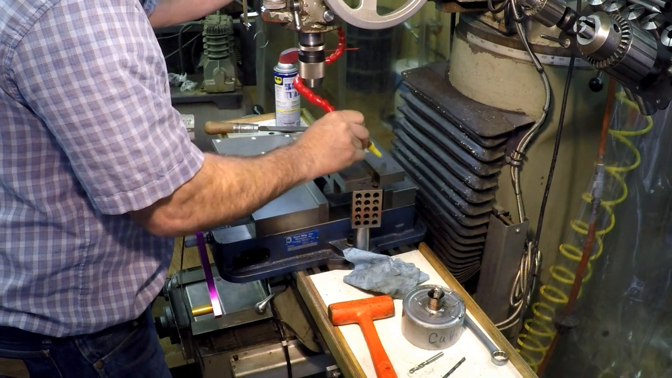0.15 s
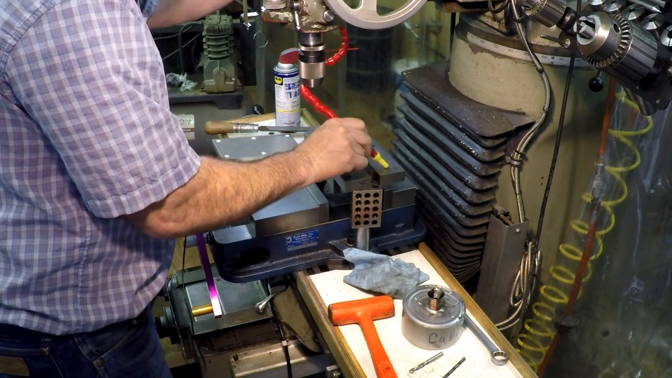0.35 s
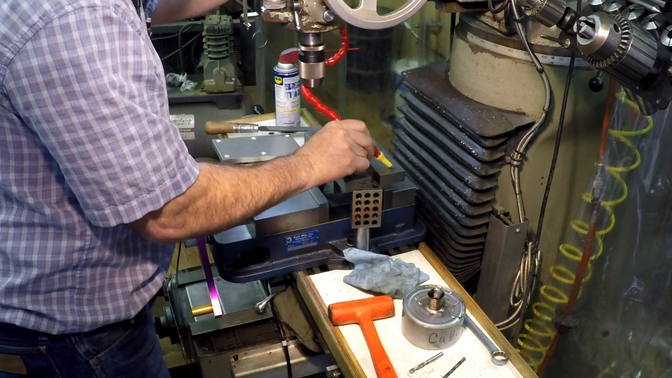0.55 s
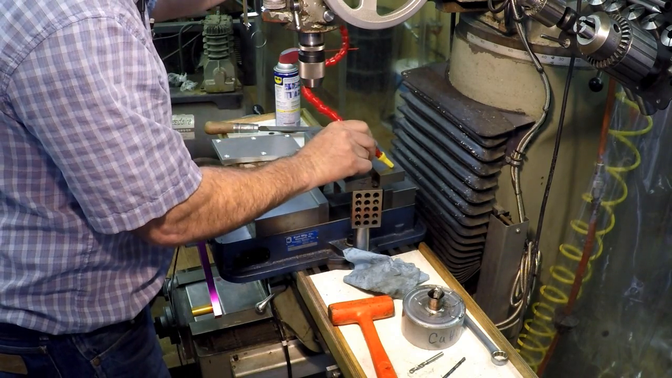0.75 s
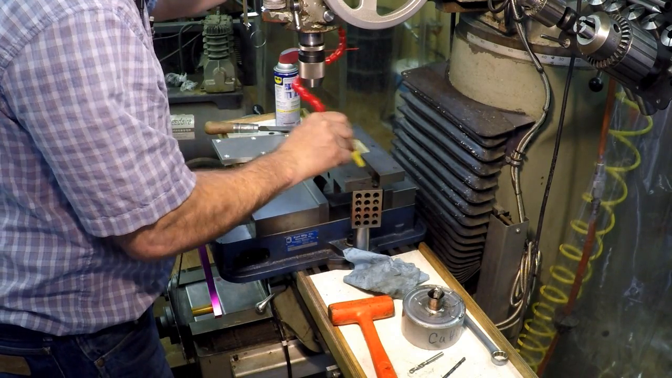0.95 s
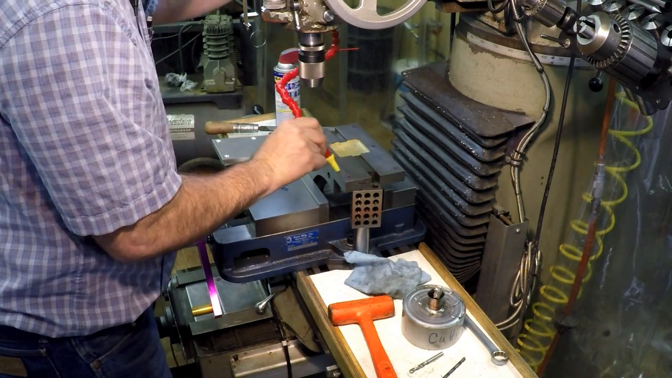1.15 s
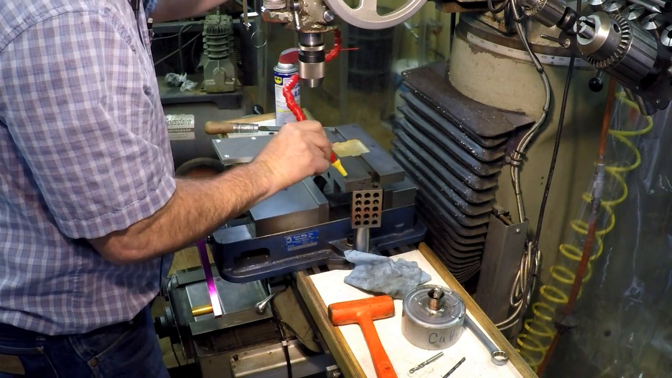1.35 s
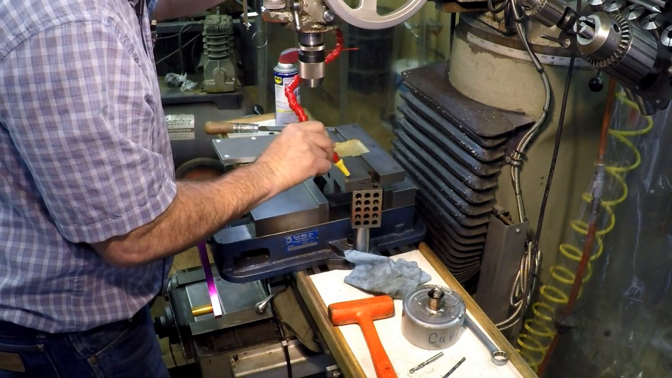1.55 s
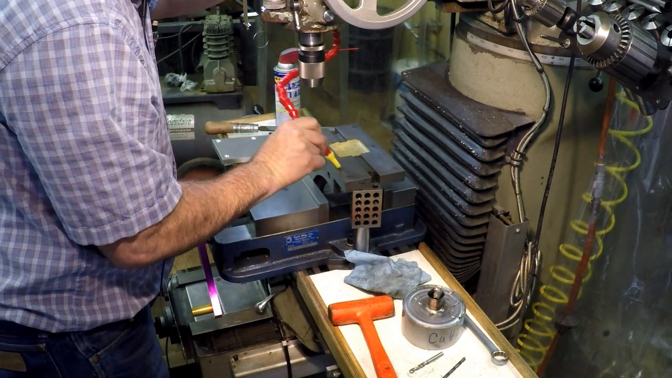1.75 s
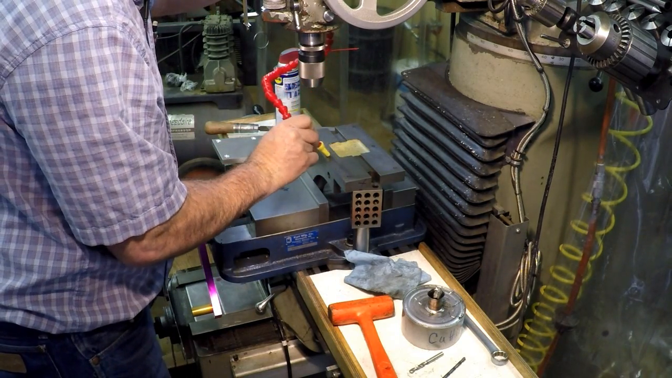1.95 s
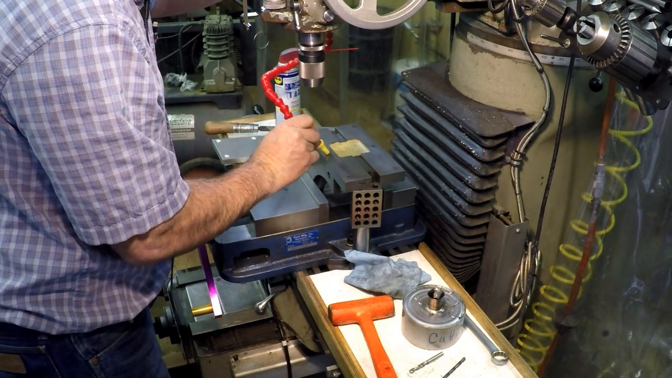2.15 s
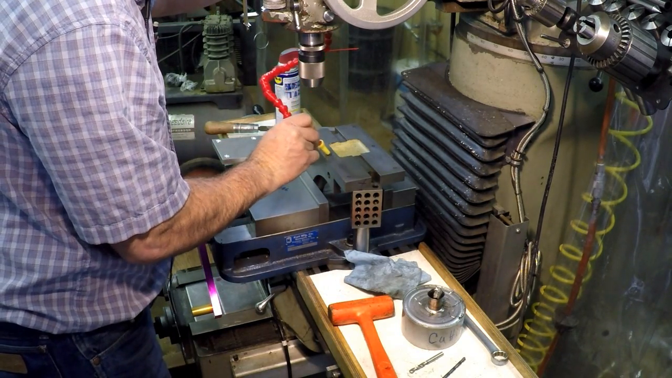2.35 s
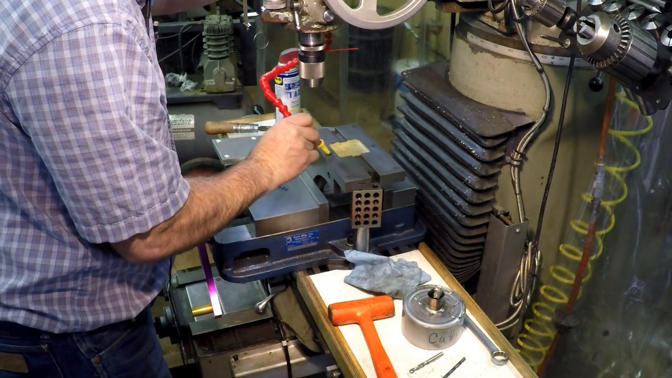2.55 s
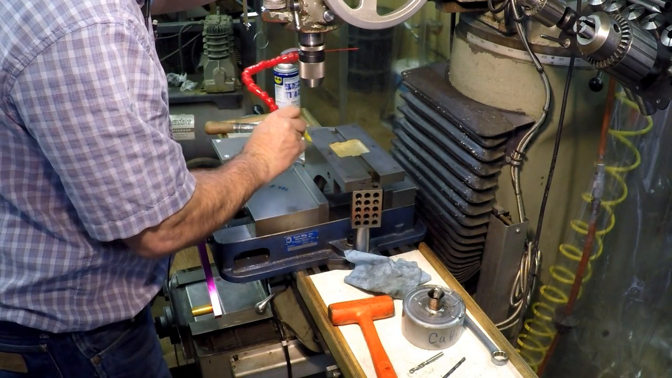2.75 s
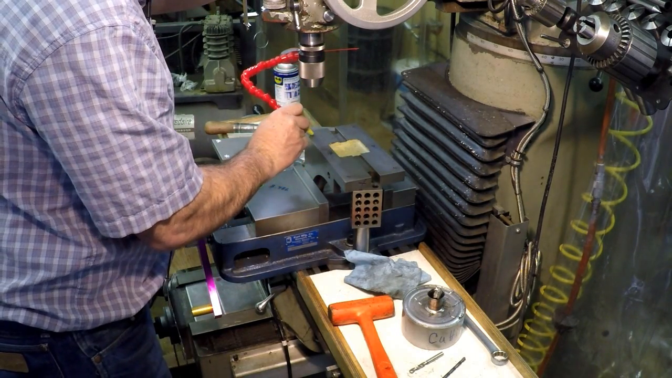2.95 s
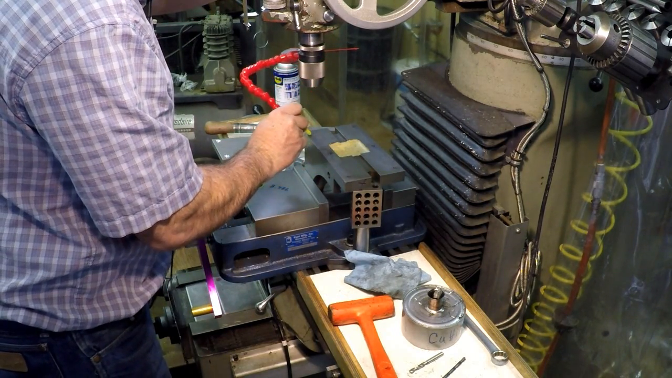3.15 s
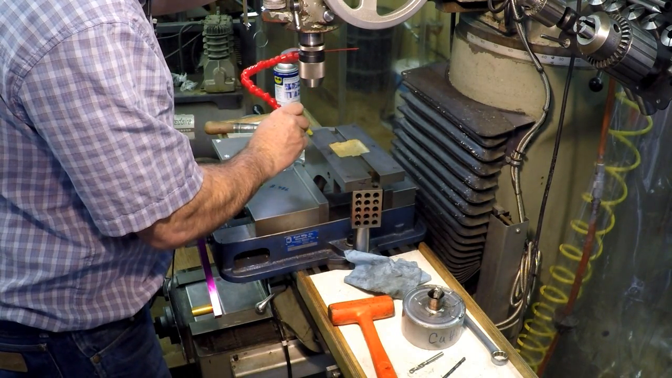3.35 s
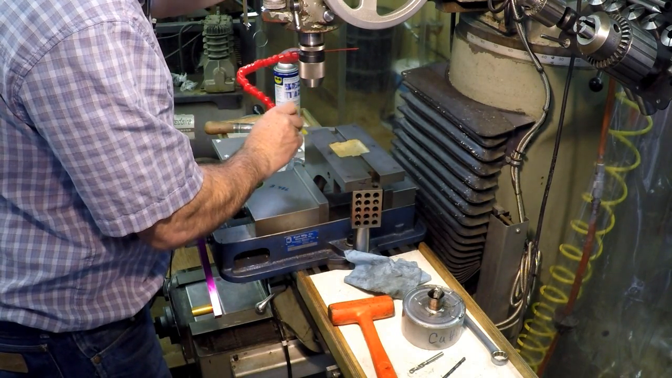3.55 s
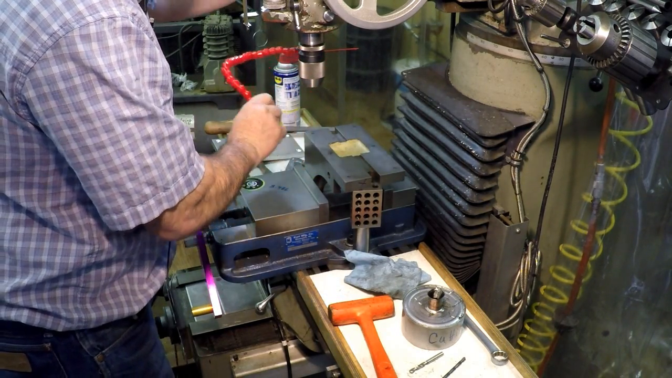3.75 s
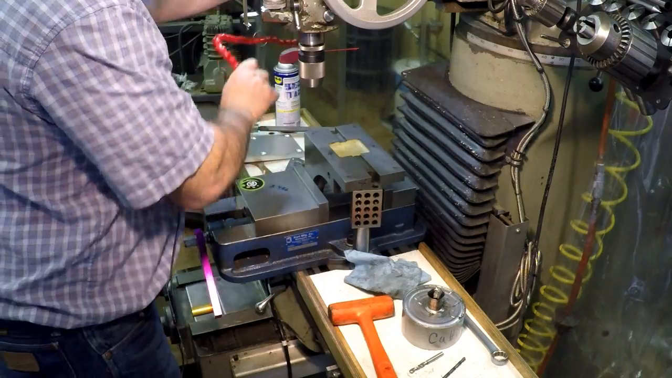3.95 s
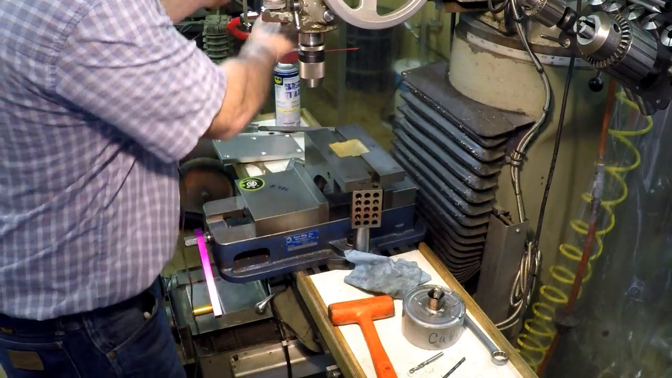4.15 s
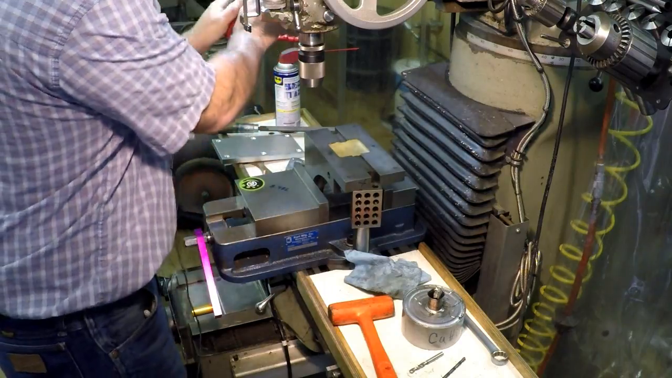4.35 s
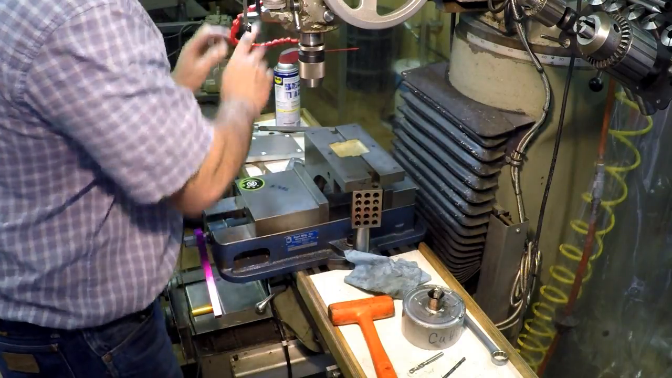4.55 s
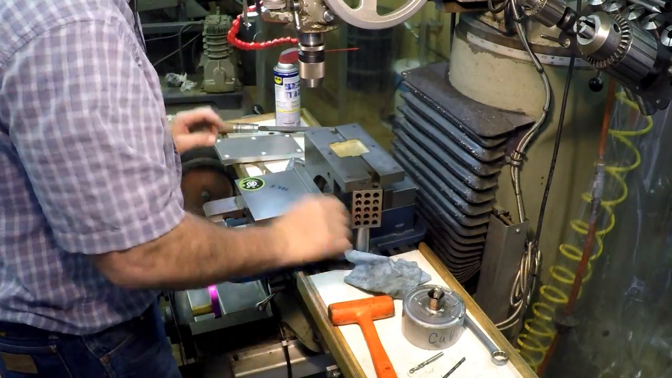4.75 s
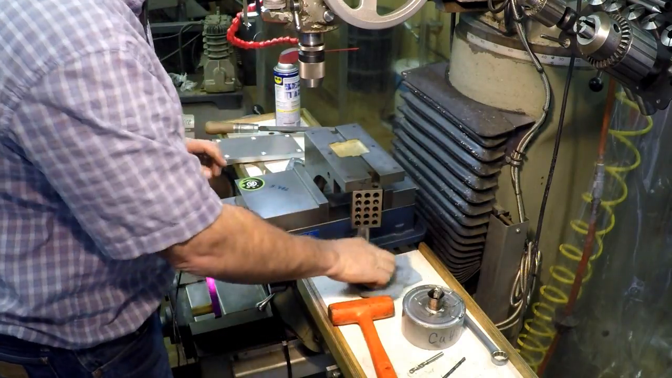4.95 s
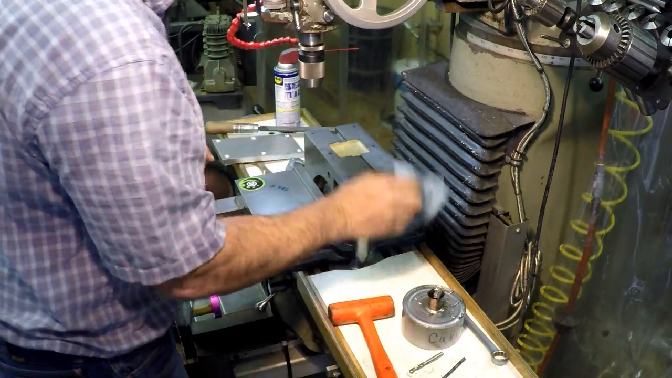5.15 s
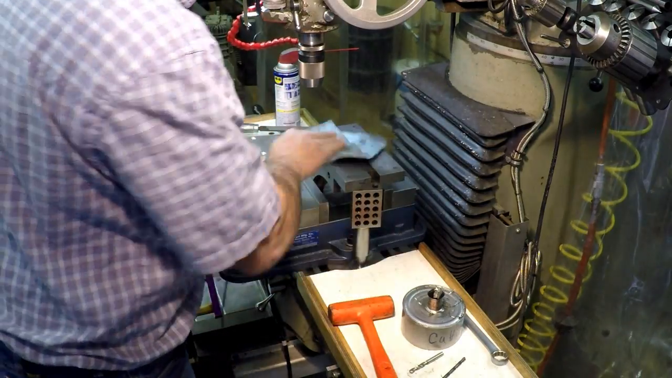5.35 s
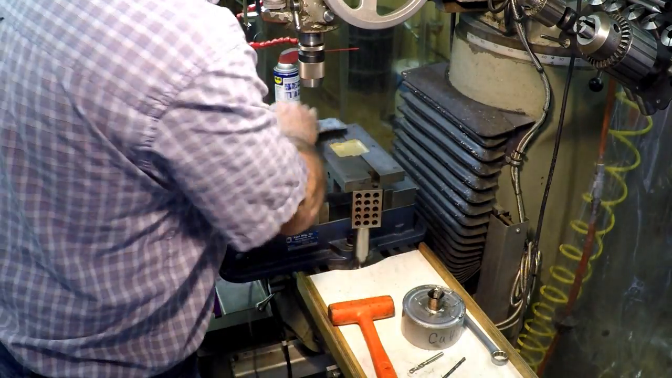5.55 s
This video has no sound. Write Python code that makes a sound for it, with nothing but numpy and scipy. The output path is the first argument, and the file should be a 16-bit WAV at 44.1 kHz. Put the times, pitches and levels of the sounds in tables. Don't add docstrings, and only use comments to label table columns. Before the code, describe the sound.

In a machine shop, an air blow gun sweeps across a metal vise, its bright hiss surging and dipping while shrill whistles slide, flutter and lock on small holes. After almost four seconds the valve shuts. A jointed plastic hose snaps and creaks, then a rag is picked up among lightly chirping tools with one low knock. A small camera microphone at arm's length catches gusts, distant hum and slight room reflections.

```python
import sys
import numpy as np
from scipy import signal
from scipy.fft import rfft, irfft, next_fast_len
from scipy.io import wavfile
from scipy.ndimage import uniform_filter1d

SR = 44100
rng = np.random.default_rng(int(sys.argv[2]) if len(sys.argv) > 2 else 0)


def gain_from_db(level_db):
    decades = np.asarray(level_db, float) / 20
    return 10 ** decades


def pcm_store(signal):
    levels = np.round(np.clip(np.atleast_2d(signal), -1, 1) * 32767)
    wavfile.write(sys.argv[1], SR, levels.astype(np.int16).T)


N = 247396

# [low f/Hz, high f/Hz]
JET_LAYERS = [(7000, 10500), (900, 2000), (2200, 4400), (13000, 15300), (300, 800)]
# [f/Hz, density/dB per Hz]
JET_COLOUR = [(88, -63), (150, -31), (500, -30.5), (862, -22.5), (932, -24.5), (1030, -23.5), (1570, -17.5),
              (2420, -18.5), (2660, -12.5), (4330, -8), (5680, -3.5), (8540, -6), (10600, -19.5),
              (14700, -19), (15600, -19)]
# [t/s, hiss level/dB, depth/dB: near 0 down in a slot, low on a flat face]
NOZZLE_PATH = [(0, -26.5, -17), (.25, -27, -12), (.41, -27.5, -10.5), (.6, -24, -17.5), (.75, -38, -17),
               (.88, -47, -15.5), (1.03, -44, -18.5), (1.045, -48, -8.5), (1.24, -41, -10.5),
               (1.46, -31.5, -12.5), (1.66, -35, -14.5), (1.97, -47.5, -11.5), (2.17, -31.5, -18),
               (2.4, -36, -13.5), (2.64, -37.5, -18), (2.93, -44, -6), (3.22, -32.5, -8.5),
               (3.4, -41, -13.5)]
# [start t/s, length/s, extra hiss level/dB, share reaching the roar/0-1]
SHARP_EDGES = [
    (0, 0.12, 3.5, 0.4),
    (0.416, 0.036, 4, .1),
    (0.982, 0.033, 11, 0.3),
    (1.115, 0.043, 5.5, 0.9),
    (1.27, 0.038, 6, 0.1),
    (1.723, .11, 13.5, 0),
    (2.33, 0.13, 5, 0.8),
    (2.717, 0.067, 18, 0.48),
    (3.16, 0.21, 1, .1),
]
# [f/Hz, width/Hz, level/dB]
VISE_GAPS = [(1290, 100, -2), (1610, 73, 1), (2630, 72, 3), (2959, 63, 7), (2976, 70, -8.5), (3390, 110, 4),
             (5040, 150, 3), (6650, 100, -2), (7450, 150, 4.5), (8530, 123.63, 0.5), (9340, 90, 0),
             (11700, 170, 2.5)]
# [start t/s, length/s, f/Hz, width/Hz, level/dB]
RASPS = [(0, 0.08, 5840, 930, -19.5), (0, 0.11, 7100, 500, -27), (0.16, 0.06, 5480, 250, -32),
         (0.414, 0.33, 6300, 300, -28), (1.362, .05, 5250, 300, -41), (1.576, 0.045, 4820, 200, -30.5),
         (1.735, 0.085, 4850, 400, -32), (1.755, 0.07, 5590, 500, -27), (2.382, 0.08, 5400, 1500, -29.5),
         (2.725, 0.065, 6020, 300, -26.5), (3.158, 0.6, 6780, 500, -41.5), (2.891, 0.08, 680, 520, -53),
         (5.515, 0.16, 5500, 4000, -59), (3.197, 0.17, 5270, 300, -41.5), (3.0, .74, 9000, 1500, -50),
         (3.14, .13, 14400, 900, -50), (.23, .48, 3000, 1500, -46), (2.375, .025, 5550, 300, -24),
         (.993, .02, 5600, 2200, -39), (1.128, .022, 4200, 2500, -44), (1.722, .04, 220, 160, -58),
         (3.715, .025, 5450, 400, -33), (3.69, .05, 5900, 500, -27), (.55, .17, 1900, 900, -52),
         (.47, .2, 5600, 500, -28), (0, .1, 6500, 250, -28)]
# [start t/s, length/s, f/Hz, width/Hz, level/dB]
SPLASHES = [(2.39, 0.081, 4500, 1600, -40.5), (2.72, 0.067, 2700, 1800, -54),
            (2.893, 0.052, 700, 280, -49.5), (2.98, .06, 1230, 500, -56), (1.726, .035, 8200, 2200, -34),
            (1.727, .035, 11700, 500, -33), (1.35, .06, 4670, 530, -36.5), (1.4, 0.098, 5400, 920, -32),
            (.22, 0.114, 3040, 1300, -39.5), (3.3, 0.46, 230, 120, -64), (4.225, 0.123, 1050, 500, -55.5),
            (4.39, 0.069, 1160, 600, -59), (4.5, 0.05, 1120, 600, -56.5), (1.04, 0.4, 2140, 500, -60),
            (.07, .052, 6300, 2500, -29), (2.45, .13, 7700, 1300, -40), (4.417, .012, 3900, 1500, -60),
            (4.8, .012, 4200, 2500, -61)]
# [loose breathy tone level/dB, [t/s, pitch f/Hz]]
HOLE_PASSES = [ (-27, [(.44, 5317), (.52, 5320), (.57, 5620), (.62, 5620)]), (-46, [(.618, 5800),
               (.69, 5847), (.74, 6167), (.82, 6250), (.875, 6178), (.922, 6320), (1.01, 6370)]),
               (-30, [(1.41, 5200), (1.44, 5380), (1.485, 5467), (1.5, 5600), (1.525, 5730), (1.537, 5980),
               (1.546, 5900), (1.562, 6220)]), (-27, [(1.558, 5670), (1.59, 5460), (1.607, 5274),
               (1.722, 6427)]), (-27, [(1.724, 5845), (1.76, 5860), (1.835, 6350)]), (-30, [(1.835, 6090),
               (1.885, 5400), (1.905, 5050)]), (-32.5, [(2.22, 5194), (2.28, 5690), (2.335, 5700),
               (2.349, 6400), (2.355, 6300), (2.366, 5570), (2.395, 5480)]), (-28.5, [(2.45, 5117),
               (2.495, 6230), (2.55, 6490), (2.578, 6220), (2.61, 5584), (2.65, 5085), (2.702, 5990),
               (2.778, 6365), (2.825, 4860)]), (-39.5, [(3.08, 5180), (3.12, 5310)]), (-27.5, [(3.17, 5800),
               (3.214, 6027), (3.3, 5894), (3.345, 5890), (3.364, 5950)]), (-40, [(3.362, 5940),
               (3.41, 6094), (3.545, 6075), (3.65, 6024), (3.71, 5920), (3.74, 5700)])]
# [start t/s, length/s, level/dB, change until it lets go/dB]
HOLDS = [(0.552, 0.067, -20, 2), (0.629, 0.12, -12, 1.5), (0.731, 0.089, -9.5, 0.5),
         (0.817, 0.099, -11, -7.5), (0.92, 0.025, -22, 1.5), (0.944, 0.05, -20.5, -1),
         (1.427, 0.09, -26.5, 5.5), (1.562, 0.032, -10, -3), (1.611, 0.04, -20, 10.5),
         (1.651, 0.055, -11, 2.5), (1.705, 0.025, -15, -10), (1.728, 0.049, -5, -22.5),
         (1.837, 0.046, -14.5, -10), (3.242, 0.034, -9.5, -9.5), (3.298, 0.042, -5.5, -9.5),
         (3.363, 0.075, -11, 1), (3.421, .04, -6, -0.5), (3.455, .09, -8, -5.5), (3.541, 0.16, -14, 0.5),
         (3.699, 0.037, -19, 2)]
# [middle t/s, peak level/dB, half length/s]
FLICKS = [(0.518, -13.5, 0.0081), (0.579, -11, 0.0015), (.571, -14.5, .002), (.59, -16, .002),
          (0.613, -15, 0.0036), (0.626, -7.5, 0.0035), (0.537, -15.5, 0.0034), (1.501, -16, 0.0086),
          (1.537, -12.5, 0.0094), (2.256, -20.5, 0.0058), (2.279, -10.5, 0.011), (2.287, -16, 0.004),
          (2.354, -25.5, 0.0095), (2.361, -10, 0.0032), (2.367, -10, .003), (1.553, -17.5, 0.0071),
          (2.481, -6.5, 0.0176), (2.594, -8, 0.016), (2.69, -8.5, 0.014), (2.795, -9.5, 0.0098),
          (3.095, -25.5, 0.012), (3.213, -9, 0.0088), (3.284, -11.5, 0.004), (3.593, -10, 0.024),
          (3.352, -6.5, 0.0087)]
# [middle t/s, gain change/dB, half length/s]
FLICKERS = [(0.633, -8, 0.0012), (0.639, -9, 0.0021), (0.644, -5, 0.0013), (0.663, -2.5, 0.0038),
            (0.686, -10, 0.0024), (0.721, -6, 0.001), (0.728, -8.5, 0.0021), (0.7421, -4, 0.0009),
            (1.57, -8, 0.002), (1.581, -19, 0.001), (1.5854, -12, 0.00055), (1.63, -4, 0.0014),
            (1.644, -6, 0.0011), (1.655, -6.5, .0015), (1.6682, -6.5, 0.0023), (1.682, -8.5, 0.0023),
            (1.702, -3.5, 0.0019), (1.742, -12.5, 0.0007), (1.748, -8, 0.0008), (1.756, -12, 0.0014),
            (1.852, 1, 0.0009), (1.8614, 7, 0.00079), (1.868, -5, 0.00067), (1.875, -5, 0.0012),
            (2.2843, -7.5, 0.0009), (2.287, -6, .0009), (2.479, -18, 0.0009), (2.4887, -9.0, 0.00092),
            (2.493, -7, 0.0011), (2.598, -25, 0.0009), (2.604, -4, 0.0015), (2.6916, -15, 0.0009),
            (2.696, 3, 0.0006), (2.801, -10, 0.00064), (3.246, -8, .002), (3.2545, -21, 0.0009),
            (3.26, -17.0, 0.0015), (3.303, -5.5, .001), (3.307, -3.5, .001), (3.332, -7, .001),
            (3.348, -8, .001), (3.3167, -12.5, 0.001), (3.452, -12, 0.0012), (3.4673, -7, 0.0017),
            (3.545, -9.5, 0.006), (3.567, -5.5, 0.005), (3.665, -8, 0.0017), (3.712, -12, 0.0009),
            (3.721, -9, 0.0013), (3.7285, -14, 0.0012)]
# [start t/s, length/s]
HAND_STILL = [
    (.72, .22),
    (3.36, .29),
]
# [t/s, level/dB]
HOLLOW_LEVEL = [
    (2.85, -72),
    (2.95, -54),
    (3.03, -37.5),
    (3.26, -38.5),
    (3.332, -50),
    (3.722, -55.5),
    (3.75, -62),
]
# [f/Hz, width/Hz, level/dB]
HOLLOW_MODES = [(418, 38.6, -2), (668, 65, 0.5), (1300, 50, 9), (1476, 17, 3.5), (2786, 80, -18),
                (3350, 66, -3.5)]
# [middle t/s, level/dB, half length/s]
GUSTS = [(0, -55.5, 0.12), (0.3, -53.5, 0.078), (.62, -55.5, 0.061), (0.807, -44.5, 0.069),
         (1.7, -49.5, 0.017), (1.739, -45, 0.018), (2.857, -67.5, 0.57), (3.587, -60, 0.15),
         (4.221, -66, 0.063), (4.463, -62, 0.055), (4.94, -63.5, .12), (5.519, -61.5, .12)]
# [f/Hz, density/dB per Hz]
SHOP_COLOUR = [(24, -9.5), (40, -3), (120, -3), (170, -12), (510, -13.5), (1190, -17.5), (1490, -12),
               (1960, -22.5), (4300, -24), (8000, -26.5), (11000, -32.5), (14500, -30.5), (15600, -47)]
# [t/s, repetition f/Hz, pitch f/Hz, level/dB]
CAMERA_TICK = (4.6304, 59.94, 12800, -63)
# [t/s, peak level/dB, ring against it/dB, centre of ring f/Hz]
SNAPS = [(3.9582, -23, -8.5, 4170), (4.048, -30.5, -10.5, 1300), (4.1156, -32, -15, 426),
         (4.1628, -29, -13, 410), (4.1995, -29.5, 0.5, 4300), (4.2144, -49, 4.5, 427),
         (4.3899, -46.5, 1, 4400), (4.4183, -50, 4, 3760), (4.4512, -51.5, 12, 1490), (4.528, -52, 2, 1200),
         (4.242, -49, -2, 1100), (4.269, -51, 0, 1003), (4.291, -49, 1, 1160), (4.318, -60, -3, 998),
         (4.4777, -48, 10, 1482), (4.5404, -47.5, 11, 2420), (4.6235, -48, 6, 2000),
         (4.975, -53.5, 5, 3000), (4.8037, -58.5, -16, 1530), (5.0726, -54, 6, 4400),
         (5.1017, -48, -3, 1490)]
# [f/Hz, density/dB per Hz]
SNAP_COLOUR = [(290, -43), (1000, -12), (1820, -3.5), (2160, -3), (2540, -7), (3190, -0.5), (4980, -4),
               (8980, -3), (15500, -21.5)]
# [f/Hz, level/dB, t60/s]
HOSE_MODES = [(311, 5, 0.2), (419.5, 7.5, 0.3), (870, 2, 0.27), (925, -10.5, 0.26), (1120, -2.5, 0.26),
              (1300, -3, 0.085), (2117, -2, 0.078), (3760, -3, 0.056), (4400, 1.5, 0.051)]
# [t/s, peak level/dB, f/Hz, length/s]
CREAKS = [(3.968, -51, 431, 0.041), (4.12, -51, 420, 0.04), (4.165, -49.5, 420, 0.035),
          (4.22, -54, 320, 0.132), (4.236, -53, 1130, 0.075), (4.232, -53, 917, 0.13),
          (4.393, -57, 407, 0.053), (4.452, -57, 1490, 0.04), (4.47, -53.5, 324, 0.075),
          (4.5, -52.5, 850, .12), (4.627, -54, 1300, .03), (4.39, -56, 1250, .035),
          (4.335, -55, 1100, .035), (4.12, -55, 1250, .03), (4.052, -55, 1300, .04)]
# [t/s, peak level/dB, f/Hz, length/s]
CHIRPS = [(4.815, -52, 1490, .02), (4.84, -51, 1490, .045), (4.85, -59, 1640, .04), (4.89, -51, 1490, .045),
          (4.935, -55, 1490, .1), (4.945, -56, 1640, .04), (5.097, -54, 1500, .025),
          (5.355, -53, 1480, .035), (5.525, -56, 1500, .025), (5.555, -57, 1500, .05),
          (5.56, -59, 1650, .04)]
# [t/s, level/dB, f/Hz, t60/s]
THUMP = (5.103, -34, 205, .18)
# [start t/s, length/s, level/dB, brightness/dB]
RUBS = [(3.973, 0.025, -56, 8), (4.047, 0.094, -51, -10), (4.112, 0.05, -48, -6), (4.156, 0.038, -42.5, -1),
        (4.193, 0.054, -42.5, -6), (4.235, 0.16, -46.5, -12.5), (4.386, 0.075, -48.5, -15),
        (4.454, 0.1, -52, -9), (4.51, 0.042, -55, -14), (4.533, 0.086, -54.5, -5), (4.628, 0.09, -58, -23),
        (4.801, .25, -76, -8.5), (5.092, 0.2, -61, 0), (5.532, 0.53, -62, 9.5)]
# [f/Hz, density/dB per Hz]
RUSTLE_COLOUR = [(88, -44), (150, -20), (257, -8.5), (300, -0.5), (450, -9.5), (601, -14.5), (1130, -4.5),
                 (1670, -14), (2310, -14), (8100, -31), (15000, -47)]
# [f/Hz, t60/s]
ROOM_DECAY = [(300, 0.29), (2000, 0.42), (6000, 0.37), (12000, 0.419)]


def evened(x):
    return x / np.sqrt(np.mean(x ** 2) + 1e-20)


def read(points, hz):
    f, value = np.transpose(points)
    return np.interp(np.log(hz + 1), np.log(f + 1), value)


def add(mix, s, sound):
    part = mix[round(s * SR):][:len(sound)]
    part += sound[:len(part)]


def plateau(t, start, length, edge):
    nearest_end = np.minimum(t - start, start + length - t)
    return np.sin(np.pi / 2 * np.clip(nearest_end / edge, 0, 1)) ** 2


def resonate(x, hz, width_hz):
    turn = np.exp(2j * np.pi * np.cumsum(hz * np.ones(len(x))) / SR)
    r = np.exp(-np.pi * width_hz / SR)
    return 2 * (turn * signal.lfilter([1 - r], [1, -r], x / turn + 1e-18)).real


def above(x, hz):
    return signal.sosfilt(signal.butter(4, hz, "high", fs=SR, output="sos"), x)


def drift(count, hz):
    settle = 4000
    noise = rng.standard_normal(count + settle)
    return evened(signal.lfilter(*signal.butter(2, hz, fs=SR), noise)[settle:])


def turbulence(colour, bands, rows, patchy_db, flicker_db):
    hz = np.fft.rfftfreq(512, 1 / SR)
    t = np.arange(N // 128 + 5) * 128 / SR
    s, first_db, *relative_db = np.transpose(rows)
    level_db = [first_db] + [first_db + rel for rel in relative_db]
    shape_db = read(colour, hz)
    knots = []
    for (lo, hi), db in zip(bands, level_db):
        inside = (hz > lo) & (hz < hi)
        inside_db = 10 * np.log10(np.sum(gain_from_db(2 * shape_db[inside])))
        knots.append((np.sqrt(lo * hi), np.interp(t, s, db, -120, db[-1]) - inside_db))
    knots.sort(key=lambda k: k[0])
    field_db = shape_db
    for k, (_, db) in enumerate(knots):
        share = read([(f, j == k) for j, (f, _) in enumerate(knots)], hz)
        field_db = field_db + np.outer(db, share)
    a, b, patches, flicker = rng.standard_normal((len(t), len(hz), 4)).transpose(2, 0, 1)
    patches = evened(uniform_filter1d(uniform_filter1d(patches, size=6, axis=1), size=20, axis=0))
    flicker = evened(uniform_filter1d(uniform_filter1d(flicker, size=90, axis=1), size=3, axis=0))
    z = (a + 1j * b) * gain_from_db(field_db + patchy_db * patches + flicker_db * flicker)
    return signal.istft(z.T, nperseg=512, noverlap=384)[1][:N]


def room(x):
    taps = np.zeros(SR // 2)
    at = np.arange(160, len(taps) - 12, 12)
    taps[at + rng.integers(0, 12, len(at))] = rng.choice([-1., 1.], len(at))
    hz, t, z = signal.stft(taps, SR, nperseg=256)
    decay = gain_from_db(-60 * t / read(ROOM_DECAY, hz)[:, None])
    tail = signal.istft(z * decay, SR, nperseg=256)[1]
    return signal.fftconvolve(x, tail / np.linalg.norm(tail))[:N]


def aim():
    t = np.arange(0, 4.2, .004)
    s, hiss_db, depth_db = np.transpose(NOZZLE_PATH)
    hiss_db = np.interp(t, s, hiss_db)
    depth_db = np.interp(t, s, depth_db)
    rise_s = 0.013
    edge_db, roar_db = np.zeros(len(t)), np.zeros(len(t))
    for at, length, db, reach in SHARP_EDGES:
        edge_db += db * plateau(t, at - rise_s * (at == 0), length, rise_s)
        roar_db += db * reach * plateau(t, at, length, rise_s)
    after = np.maximum(t - 3.722, 0)
    shut_db = np.minimum(430. * after, 11 + 131.5 * after)
    body_db = -1 + 0.55 * depth_db + 0.34 * roar_db - (1 - 0.34) * edge_db
    fizz_db = -2.5 + 0.29 * depth_db - 0.24 * shut_db - (1 - 0.22) * edge_db
    rumble_db = -5 + 1.55 * depth_db - edge_db
    return np.transpose([t, hiss_db + edge_db - shut_db, depth_db + roar_db - edge_db,
                         body_db, fizz_db, rumble_db])


def jet():
    hiss = turbulence(JET_COLOUR, JET_LAYERS, aim(), 2.2, 0.462)
    size = next_fast_len(N)
    hz = np.fft.rfftfreq(size, 1 / SR)
    gaps_db = sum(db * np.exp(-((hz - f) / w) ** 2) for f, w, db in VISE_GAPS)
    hiss = irfft(rfft(hiss, size) * gain_from_db(gaps_db), size)[:N]
    near = rng.standard_normal(9001)[1:] * gain_from_db(-60 * np.arange(9000) / SR / .2)
    reflected = signal.oaconvolve(hiss, near / np.linalg.norm(near))[:N]
    return gain_from_db(-2.5) * (hiss + gain_from_db(-3) * reflected)


def rasps(rows):
    out = np.zeros(N)
    for s, length, hz, width_hz, db in rows:
        air = rng.standard_normal(round(length * SR))
        rung = above(resonate(resonate(air, hz, width_hz), hz, width_hz), hz / 2)
        t = np.arange(len(air)) / SR
        already = s == 0
        swell = plateau(t, -1. * already, length + already, .2 * length)
        add(out, s, gain_from_db(db) * evened(rung) * swell)
    return out


def puffs():
    t = np.arange(N) / SR
    level = gain_from_db(-65) + sum(gain_from_db(db) * np.exp(-((t - s) / half) ** 2) for s, db, half in GUSTS)
    lumps = signal.butter(1, [12., 45.], "band", fs=SR, output="sos")
    rumble = signal.sosfilt(lumps, rng.standard_normal(N))
    rumble = signal.lfilter(*signal.butter(3, 220., fs=SR), rumble)
    rumble = signal.lfilter(*signal.butter(1, 150., fs=SR), rumble)
    return level * evened(rumble)


def shop():
    floor = turbulence(SHOP_COLOUR, [(100, 15000)], [(0, -63), (6, -63)], 1.2, .4)
    s, rate, hz, db = CAMERA_TICK
    t = np.arange(N) / SR
    since = ((t - s) * rate + .5) % 1 / rate - .5 / rate
    tick = gain_from_db(db) * np.exp(-(since / .0011) ** 2) * np.cos(2 * np.pi * hz * since)
    return gain_from_db(3.0) * floor + tick


def ducking(loud):
    power_db = 10 * np.log10(abs(uniform_filter1d(loud ** 2, size=2000)) + 1e-12)
    fall = np.arange(N) * 21.0 / SR
    held_db = np.maximum.accumulate(power_db + fall) - fall
    over_db = np.maximum(held_db + 23.0, 0)
    return gain_from_db(-.9 * uniform_filter1d(over_db, size=1000))


def locking(t, loose_db):
    levels = [gain_from_db(loose_db) * plateau(t, t[0], t[-1] - t[0], 0.012) + 1e-5]
    for s, length, db, change_db in HOLDS:
        progress = np.clip((t - s) / length, 0, 1)
        levels.append(gain_from_db(db + change_db * progress) * plateau(t, s, length, .004))
    for s, db, half in FLICKS:
        reach = np.where(t < s, .7 * half, half)
        levels.append(gain_from_db(db - 9 * ((t - s) / reach) ** 2))
    level = np.max(levels, axis=0)
    return level, 0.63 * np.minimum(gain_from_db(loose_db) / level, 1) ** 1.17


def whistle(loose_db, rows):
    s, pitch = np.transpose(rows)
    t = np.arange(s[0], s[-1], 1 / SR)
    hz = np.interp(t, s, pitch)
    level, breath = locking(t, loose_db)
    breath = np.clip(breath, 0, 1)
    turns = np.cumsum(hz + (6. + 130. * breath) * drift(len(t), 90.)) / SR
    octave_db = -32.5 - 19 * np.clip(abs(hz - 5980) / 1000, .1, .8)
    octave = gain_from_db(octave_db + 2.5 * drift(len(t), 120.)) * np.sin(4 * np.pi * turns)
    tone = np.sqrt(2) * (np.sin(2 * np.pi * turns) + octave)
    tone *= gain_from_db((.5 + 4. * breath) * drift(len(t), 110.))
    fuzz = evened(resonate(resonate(rng.standard_normal(len(t)), hz, 380.), hz, 450.))
    skirt = gain_from_db(-27) * evened(resonate(rng.standard_normal(len(t)), hz, 400.))
    voice = np.sqrt(1 - breath) * tone + np.sqrt(breath) * fuzz + above(skirt, 5000.0)
    return s[0], level * voice * signal.windows.tukey(len(t), 0.0028 / (s[-1] - s[0]))


def flickering():
    t = np.arange(1800) / SR
    out_db = np.zeros(N)
    for s, db, half in FLICKERS:
        add(out_db, s - .02, db * np.exp(-((t - .02) / (1.2 * half)) ** 2))
    return gain_from_db(out_db)


def stirred_room(x):
    t = np.arange(N) / SR
    moving = 1 - .93 * sum(plateau(t, s, length, .02) for s, length in HAND_STILL)
    turn = 2 * np.pi * np.cumsum(moving * (24. + 8.11 * drift(N, 6.))) / SR
    return room(x * np.cos(turn)) + room(x * np.sin(turn))


def hollow():
    s, db = np.transpose(HOLLOW_LEVEL)
    air = rng.standard_normal(N)
    rung = np.zeros(N)
    for f, w, mode_db in HOLLOW_MODES:
        rung += gain_from_db(mode_db) * evened(resonate(resonate(air, f, 4.0 * w), f, 4.0 * w))
    return gain_from_db(np.interp(np.arange(N) / SR, s, db, -120, -120) - 1.0) * evened(rung)


def snaps():
    out, t = np.zeros(N), np.arange(8192) / SR
    hz = np.fft.rfftfreq(8192, 1 / SR)
    colour = gain_from_db(read(SNAP_COLOUR, hz))
    mode_hz = np.transpose(HOSE_MODES)[0]
    for s, db, ring_db, centre_hz in SNAPS:
        dull = gain_from_db(.2 * (db + 25.) * np.log2(1 + hz / 4000.))
        crack = evened(irfft(rfft(rng.standard_normal(8192)) * colour * dull))
        crack *= np.exp(-t / 0.0026) + gain_from_db(-9.0 - 60 * t / 0.25)
        crack /= 3 * np.sqrt(np.mean(crack[:130] ** 2))
        sharp_edge = gain_from_db(-2.0) * np.exp(-t / 0.00023) * np.sin(2 * np.pi * 5630.0 * t)
        luck_db = 2.9 * rng.standard_normal(len(HOSE_MODES))
        luck = gain_from_db(luck_db - 7.9 * abs(np.log2(mode_hz / centre_hz)))
        ring = np.zeros(len(t))
        for gain, (f, mode_db, t60) in zip(luck, HOSE_MODES):
            ring += gain * gain_from_db(mode_db - 60 * t / t60) * np.sin(2 * np.pi * f * t)
        add(out, s, gain_from_db(db - 2.5) * (crack + sharp_edge) + gain_from_db(db + ring_db - 13.5) * ring)
    return out


def squeaks():
    out = np.zeros(N)
    for s, db, hz, length in CHIRPS + CREAKS:
        t = np.arange(0, length, 1 / SR)
        uneven = gain_from_db(2.8 * drift(len(t), 94.0))
        swell = np.sqrt(np.sin(np.pi * t / length))
        add(out, s, gain_from_db(db - 3.0) * uneven * swell * np.sin(2 * np.pi * hz * t))
    s, db, hz, t60 = THUMP
    t = np.arange(0, .4, 1 / SR)
    rise = 1 - np.exp(-t / .01)
    add(out, s, gain_from_db(db - 60 * t / t60) * rise * np.sin(2 * np.pi * hz * t))
    return out


def rubbing():
    t = np.arange(3.9, 5.7, .004)
    strokes = []
    for s, length, db, _ in RUBS:
        fading = gain_from_db(db - 13 * (t - s) / length)
        strokes.append(fading * plateau(t, s, length, min(0.018, length / 4)) + 1e-6)
    total = np.sum(strokes, axis=0)
    brightness_db = np.transpose(RUBS)[3] @ np.array(strokes) / total
    return np.transpose([t, 20 * np.log10(total), brightness_db])


def rustle():
    return gain_from_db(-2.0) * turbulence(RUSTLE_COLOUR, [(500, 2500), (2500, 6000)], rubbing(), 3.12, 1.8)


def crackle():
    s, db, _ = np.transpose(rubbing())
    size = gain_from_db(5. * np.minimum(rng.exponential(1, N), 3))
    clicks = size * (rng.random(N) < 1300. / SR)
    grit = evened(resonate(resonate(clicks, 1600., 1800.), 1600., 1800.))
    return gain_from_db(np.interp(np.arange(N) / SR, s, db, -120, -60) - 7.5) * grit


def scene():
    tones = rasps(RASPS)
    for loose_db, rows in HOLE_PASSES:
        add(tones, *whistle(loose_db, rows))
    cloth = rustle()
    hands = snaps() + squeaks() + crackle()
    gun = flickering() * (tones + gain_from_db(-11.5) * stirred_room(tones)) + jet() + hollow()
    hands = hands + gain_from_db(-18.0) * room(hands)
    mono = gun + hands + cloth + puffs() + ducking(gun) * shop() + rasps(SPLASHES)
    return np.array([mono, mono])


def top_cut(x):
    return signal.sosfilt(signal.butter(12, 16590, fs=SR, output="sos"), x)


def record(dry):
    soft = .85 * np.tanh(dry / .85)
    low_pass = signal.firwin(1501, 15340, window=("kaiser", 9), fs=SR)
    finished = signal.oaconvolve(soft, low_pass[None], "same")
    return top_cut(finished)


dry = scene()
out = record(dry)
pcm_store(out)
```